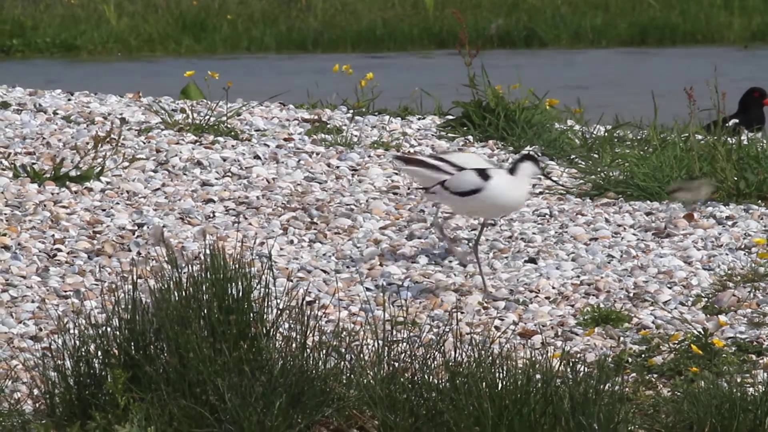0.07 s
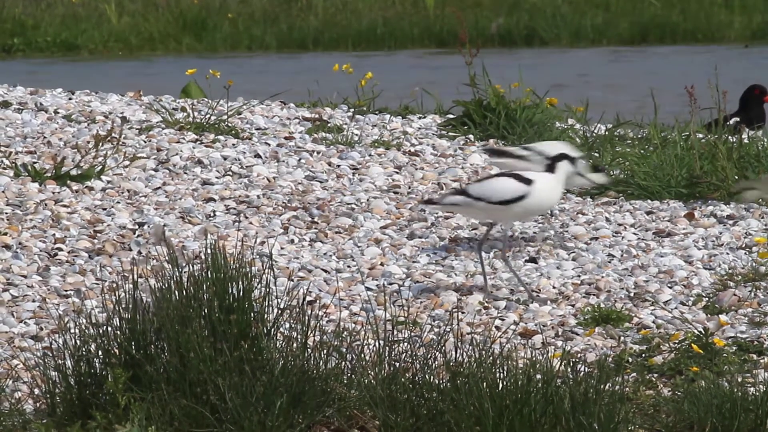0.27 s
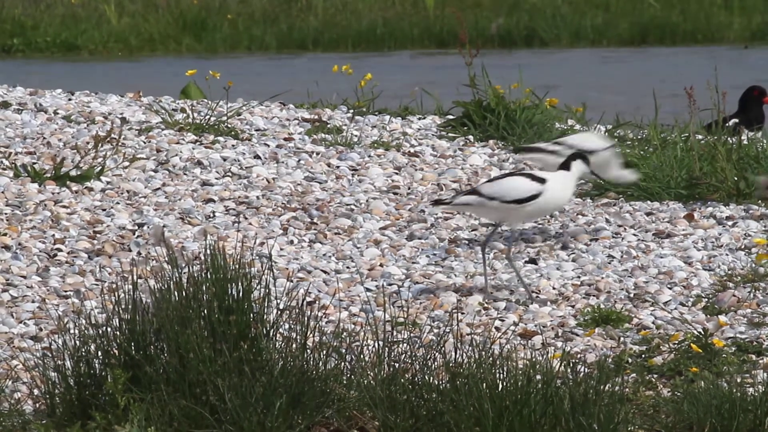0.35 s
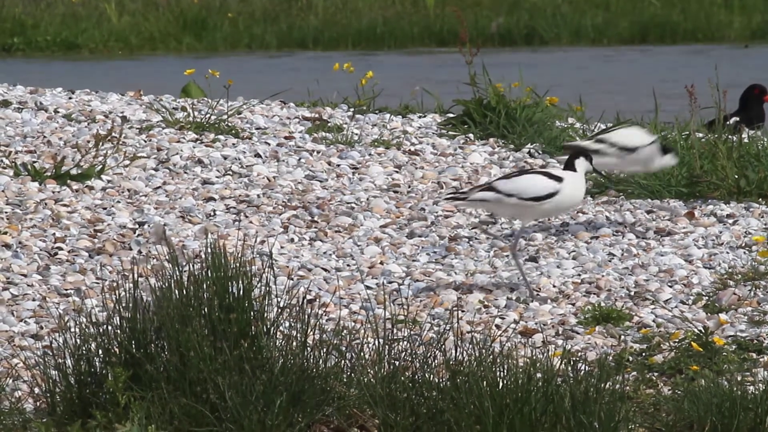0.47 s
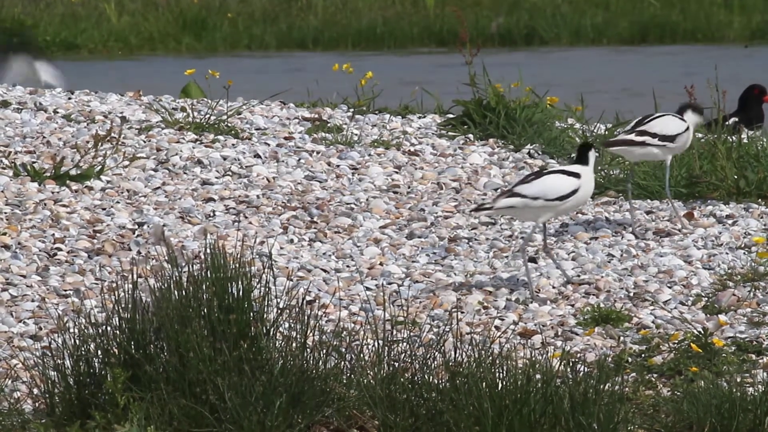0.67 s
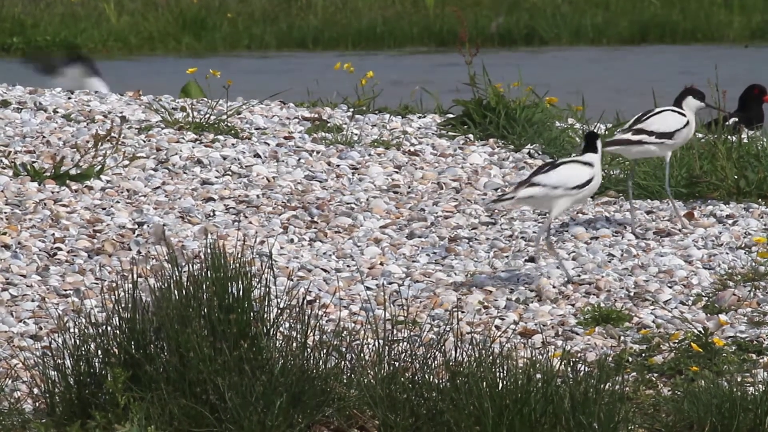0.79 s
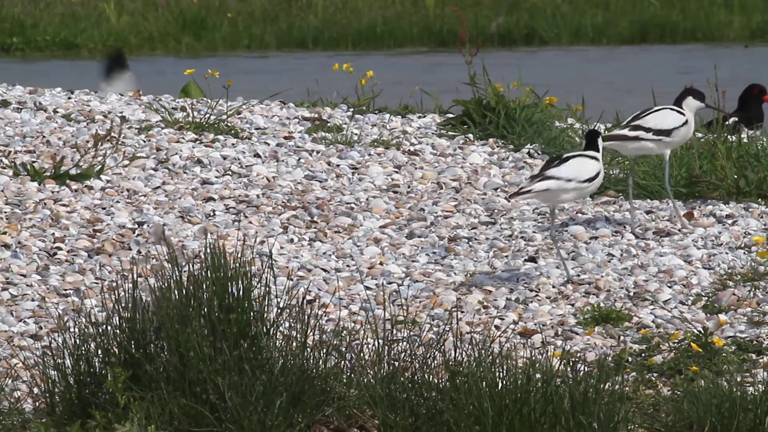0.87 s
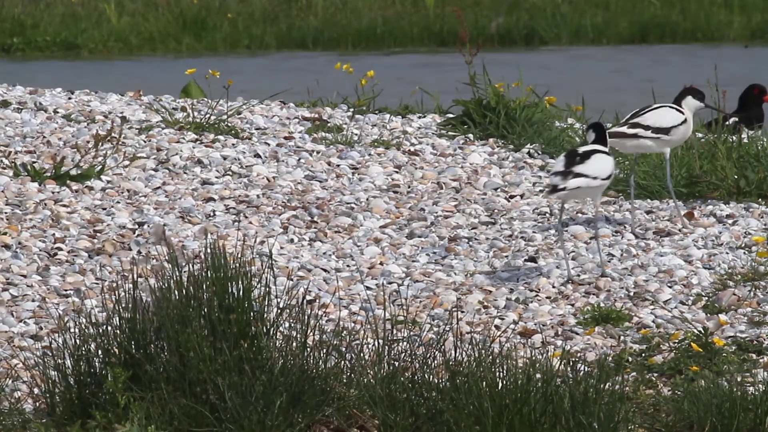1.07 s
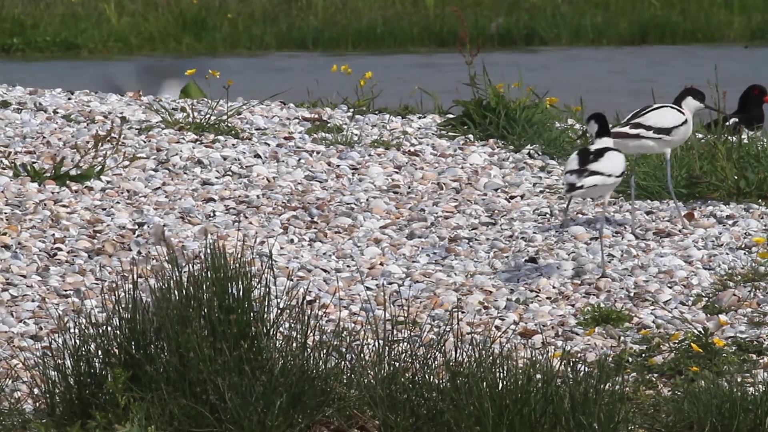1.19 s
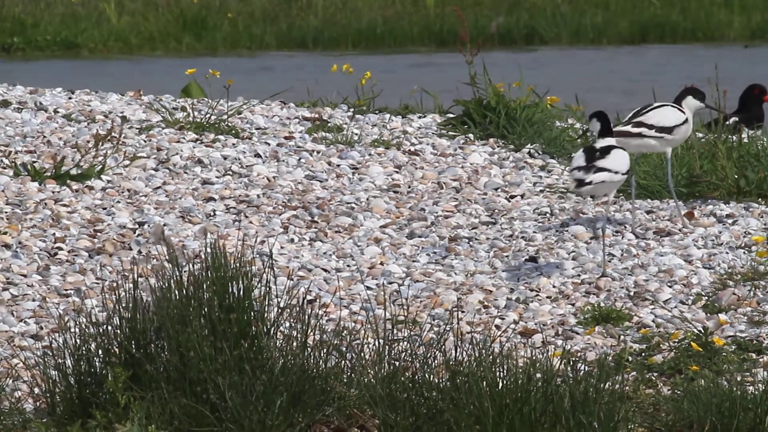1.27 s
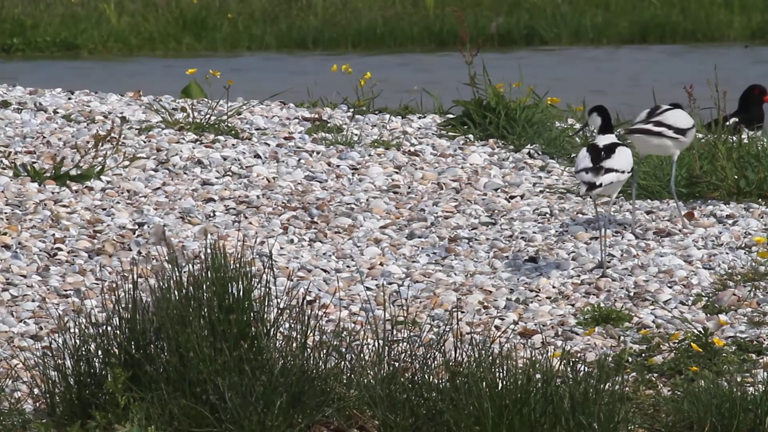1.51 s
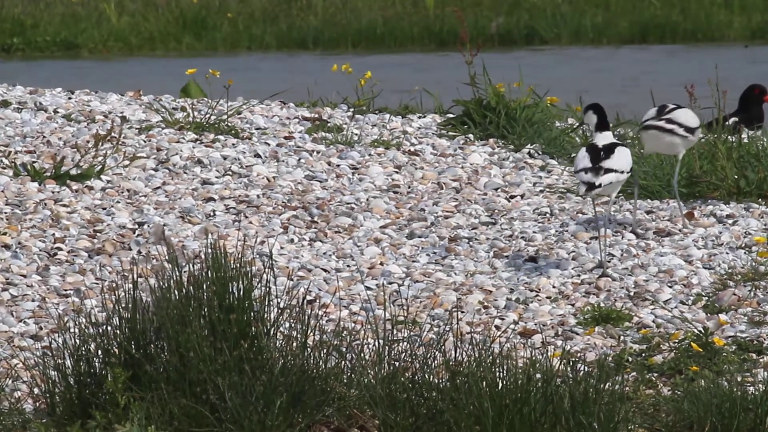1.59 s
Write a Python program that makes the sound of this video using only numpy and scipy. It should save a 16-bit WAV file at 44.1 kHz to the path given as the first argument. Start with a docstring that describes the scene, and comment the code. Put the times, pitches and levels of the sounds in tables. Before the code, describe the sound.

A shorebird whistles once while another pips faintly, with light wind and a distant rumble.

```python
"""First comes wind hissing in the grass over a distant low rumble, both spectrally shaped noise.
Then shorebirds call from a shell bank beside open water, each call a frequency-modulated tone:
one repeats a faint, down-slurred pip about five times a second, and another, close by, gives a
single rising whistle. The ground scatters both weakly. Around them are a few far, hoot-like
swells, thin squeaks, tiny clicks of loose shells and one soft thump."""
import sys
import numpy as np
from scipy import signal
from scipy.fft import rfft, irfft, next_fast_len
from scipy.io import wavfile
from scipy.ndimage import uniform_filter1d, map_coordinates

SR = 44100
rng = np.random.default_rng(int(sys.argv[2]) if len(sys.argv) > 2 else 0)


def waveform_to_disk(signal):
    """Save audio, clipped to [-1, 1], as 16-bit WAV at the path in sys.argv[1]."""
    frames = np.transpose(np.atleast_2d(signal))
    scaled = np.clip(frames, -1, 1) * 32767
    samples = np.round(scaled).astype(np.int16)
    wavfile.write(sys.argv[1], SR, samples)


N = 72765


def amp(db):
    """Decibels to amplitude ratio."""
    return 10 ** (np.asarray(db) / 20)


def unit(x):
    """Normalisation to rms 1."""
    return x / np.sqrt(np.mean(x ** 2) + 1e-20)


def clock():
    """The time of each sample in seconds."""
    return np.arange(N) / SR


def bell(x, centre, half_width):
    """A Gaussian of height 1 that falls to 1/e at half_width from its centre."""
    return np.exp(-((x - centre) / half_width) ** 2)


def curves(rows):
    """Linear interpolation in time: one curve for each column after the first."""
    times, *columns = np.transpose(rows)
    return [np.interp(clock(), times, column) for column in columns]


def wobble(rate_hz):
    """Smooth random modulation: a spline through rate_hz Gaussian values a second."""
    knots = rng.standard_normal(int(N * rate_hz / SR) + 4)
    return map_coordinates(knots, [clock() * rate_hz])


def filtered(x, response):
    """Zero-phase filtering: the spectrum of x is multiplied by response(hz)."""
    size = next_fast_len(N + 8192)
    return irfft(rfft(x, size) * response(np.fft.rfftfreq(size, 1 / SR)), size)[:N]


def band_noise(centre_hz, half_width_hz):
    """Band-pass noise of rms 1 with a Gaussian spectrum."""
    return unit(filtered(rng.standard_normal(N), lambda hz: bell(hz, centre_hz, half_width_hz)))


def coloured_noise(spectrum, patchy_db):
    """Spectrally shaped noise of rms 1, its gain varying in random patches of time and frequency."""
    white = signal.stft(rng.standard_normal(N), nperseg=512)[2]
    patches = uniform_filter1d(rng.standard_normal(white.shape), size=7, axis=0)
    patches = uniform_filter1d(patches, size=16, axis=1)
    noise = signal.istft(white * amp(patchy_db * unit(patches)), nperseg=512)[1][:N]
    hz, db = np.transpose(spectrum)
    return unit(filtered(noise, lambda f: amp(np.interp(np.log(f + 1), np.log(hz + 1), db))))


def tone(hz):
    """A sinusoid of rms 1 whose phase is the integral of its frequency."""
    return np.sqrt(2) * np.sin(2 * np.pi * np.cumsum(hz) / SR)


# Spectrum of the rumble: frequency_hz, relative_density_db
RUMBLE_SPECTRUM = [(20, -31), (32, -14), (52, -5), (80, -8), (105, -5.5), (140, -9.5), (190, -4), (260, -8),
                   (330, -1), (387, 1), (435, -4.5), (493, -0.1), (565, -8.5), (612, -4.5), (666, -11),
                   (760, -4.5), (915, -14), (1500, -27), (2200, -55)]

def distant_rumble(level_db=-55):
    """Random noise with its energy at low frequencies is heard as a far rumble."""
    return amp(level_db + 0.4 * wobble(10.1)) * coloured_noise(RUMBLE_SPECTRUM, patchy_db=1.5)


# Envelope of the wind's hiss: time_s, level_db
HISS_LEVELS = [(0, -55), (.12, -55), (.27, -52.5), (.31, -56), (.39, -57.5), (.48, -60.5), (.63, -59.5),
               (.74, -56), (.84, -59.5), (.92, -58), (1.08, -58.5), (1.33, -60.5), (1.65, -60.5)]
# Spectrum of the hiss in the grass: frequency_hz, relative_density_db
GRASS_SPECTRUM = [(590, -38), (1000, -2), (1940, -3), (3000, -1.5), (4500, -1.4), (6300, -4.5),
                  (8600, -6.5), (12500, -8), (14000, -9), (15500, -11.5)]
# Envelope of the highest fizz in the grass: time_s, level_db
FIZZ_LEVELS = [(0, -77), (.12, -65), (.22, -67), (.33, -60), (.38, -69), (.64, -73), (.74, -64), (.83, -77),
               (.9, -68), (1.08, -68), (1.3, -78)]
# Envelope of the mid-range rustle: time_s, level_db
RUSTLE_LEVELS = [(0, -63), (.3, -64.5), (.55, -69), (.8, -77), (1.4, -75), (1.65, -65.5)]
# Brief puffs of rustle: peak_s, centre_hz, half_width_s, level_db
RUSTLE_PUFFS = [(0.142, 1250, 0.0064, -59), (0.265, 1032, 0.012, -55), (0.56, 1060, 0.0087, -60.5),
                (1.633, 1080, 0.0092, -60)]

def wind_in_grass():
    """Air flowing through grass makes broadband noise, amplitude-modulated by the gusts."""
    (hiss_db,), (fizz_db,), (rustle_db,) = map(curves, (HISS_LEVELS, FIZZ_LEVELS, RUSTLE_LEVELS))
    hiss = amp(hiss_db + 0.22 * wobble(19.9)) * coloured_noise(GRASS_SPECTRUM, patchy_db=1.5)
    fizz = amp(fizz_db) * band_noise(11900, half_width_hz=3400)
    rustle = amp(rustle_db + 1.1 * wobble(30)) * band_noise(1180, half_width_hz=1430)
    puffs = sum(amp(db) * bell(clock(), peak_s, half_width_s) * band_noise(hz, half_width_hz=220)
                for peak_s, hz, half_width_s, db in RUSTLE_PUFFS)
    return hiss + fizz + rustle + puffs


# Far, hoot-like swells: peak_s, pitch_hz, half_width_s, level_db
HOOT_SWELLS = [(0.634, 415, 0.0097, -51), (0.894, 488, 0.021, -51.5), (1.084, 486, 0.025, -57)]

def far_hoots():
    """Random frequency modulation makes each low tone waver as it swells and fades."""
    return sum(amp(db) * bell(clock(), peak_s, half_width_s) * tone(hz * (1 + 0.0516 * wobble(110)))
               for peak_s, hz, half_width_s, db in HOOT_SWELLS)


# Faint, high squeaks: peak_s, pitch_hz, half_width_s, level_db
SQUEAK_NOTES = [(0.198, 5100, .008, -62), (0.243, 5740, .04, -62), (0.745, 5200, 0.043, -67),
                (0.812, 4500, 0.063, -65)]

def far_squeaks():
    """Narrow-band noise is heard as a thin, fuzzy note at its centre frequency."""
    return sum(amp(db) * bell(clock(), peak_s, half_width_s) * band_noise(hz, half_width_hz=210)
               for peak_s, hz, half_width_s, db in SQUEAK_NOTES)


# Clicks of loose shells: peak_s, level_db
SHELL_CLICKS = [(0.279, -50), (0.402, -53), (0.9055, -53.5)]

def loose_shells(half_width_s=0.0014):
    """Brief contacts between shells radiate short bursts of wide-band, high-frequency noise."""
    envelope = sum(amp(db) * bell(clock(), peak_s, half_width_s) for peak_s, db in SHELL_CLICKS)
    return envelope * band_noise(6440, half_width_hz=3200)


def thump(start_s=0.5748, pitch_hz=193, level_db=-40.5, attack_s=0.0011, t60_s=0.056):
    """A heavily damped oscillation is heard as one soft, low knock."""
    age = np.clip(clock() - start_s, 0, None)
    envelope = amp(level_db - 60 * age / t60_s) * (1 - np.exp(-age / attack_s))
    return envelope * np.sin(2 * np.pi * pitch_hz * age)


def ground_scatter(calls, gain_db=-23, delay_s=0.0012, t60_s=0.082):
    """Diffuse reflection off the shell bank: convolution with exponentially decaying noise."""
    t = np.arange(SR // 4) / SR
    tail = rng.standard_normal(len(t)) * amp(-60 * t / t60_s) * (t > delay_s)
    return amp(gain_db) * signal.fftconvolve(calls, tail / np.linalg.norm(tail))[:N]


# The faint bird's pips: start_s, drop_level_db, held_pitch_hz, held_relative_db
PIP_CALLS = [(0.169, -48.5, 3120, -5), (0.359, -52.5, 3020, 0), (0.5770, -54, 2830, -10),
             (0.7890, -55.5, 3080, -3.5), (0.99, -53, 2970, -9), (1.2018, -52, 3130, -5.5),
             (1.3975, -53.5, 3000, -5), (1.5927, -53.5, 3100, -5)]

def pipping_bird(drop_hz=1430, drop_s=0.00682, sag_after_s=0.0147, sag_hz_per_s=36000, octave_db=-10):
    """Each pip is a downward frequency sweep that drops steeply, holds a moment and sags away."""
    pips = np.zeros(N)
    for start_s, level_db, held_hz, held_db in PIP_CALLS:
        age = clock() - start_s
        hz = held_hz + drop_hz * np.clip(1 - age / drop_s, 0, 1)
        hz -= sag_hz_per_s * np.clip(age - sag_after_s, 0, 0.02)
        hz *= 1 + 0.01245 * wobble(300)
        # Two pulses of level; only the held part carries the second harmonic.
        drop = bell(age, centre=0.0039, half_width=0.0026)
        hold = amp(held_db) * bell(age, centre=0.015, half_width=0.0048)
        pips += amp(level_db) * ((drop + hold) * tone(hz) + amp(octave_db) * hold * tone(2 * hz))
    return pips


# Contour of the near bird's whistle: time_s, pitch_hz, level_db
WHISTLE_CONTOUR = [(0.203, 1580, -61), (0.217, 1857, -47), (0.227, 1952, -43), (0.230, 2178, -40.5),
                   (0.239, 2271, -40), (0.245, 2297, -36.5), (0.267, 2507, -32), (0.279, 2541, -31.5),
                   (0.293, 2446, -32.5)]
# Overtones of the whistle: harmonic_number, relative_level_db
WHISTLE_HARMONICS = [(2, -41), (3, -38)]

def whistling_bird(flick_start_s=0.295, flick_s=0.0035, flick_hz_per_s=280000, release_db_per_s=4900,
                   attack_s=0.003, jitter=0.0037, rasp_depth=0.4, rasp_fade_s=0.021, halo_fade_s=0.018):
    """A nearly pure tone glides up in frequency and swells, then flicks upward as it is cut off."""
    t = clock()
    hz, db = curves(WHISTLE_CONTOUR)
    age = t - WHISTLE_CONTOUR[0][0]
    flick_age = np.clip(t - flick_start_s, 0, None)
    hz = hz * (1 + jitter * wobble(700)) + flick_hz_per_s * np.minimum(flick_age, flick_s)
    voice = tone(hz) + sum(amp(level) * tone(round(k) * hz) for k, level in WHISTLE_HARMONICS)
    envelope = np.clip(age / attack_s, 0, 1) * amp(db - release_db_per_s * flick_age)
    # The voice starts rough and breathy, then clears.
    rasp = 1 + rasp_depth * np.exp(-np.abs(age) / rasp_fade_s) * wobble(800)
    breath = amp(-54) * bell(t, centre=0.214, half_width=0.011) * band_noise(2250, half_width_hz=220)
    # A diffuse halo of noise trails the note.
    pole = np.exp(-1 / (halo_fade_s * SR))
    lagging_envelope = signal.lfilter([1 - pole], [1, -pole], envelope)
    halo = amp(-20) * lagging_envelope * band_noise(2560, half_width_hz=230)
    return voice * rasp * envelope + breath + halo


def scene():
    """Linear superposition of all sources, the same in both channels."""
    background = distant_rumble() + wind_in_grass() + far_hoots() + far_squeaks()
    knocks = loose_shells() + thump()
    birds = pipping_bird() + whistling_bird()
    mono = background + knocks + ground_scatter(birds) + birds
    return np.array([mono, mono])


def record(dry, cutoff_hz=15700):
    """Band limiting: an ideal low-pass filter removes everything above the cutoff."""
    return np.array([filtered(channel, lambda hz: hz < cutoff_hz) for channel in dry])


dry = scene()
out = record(dry)
waveform_to_disk(out)
```